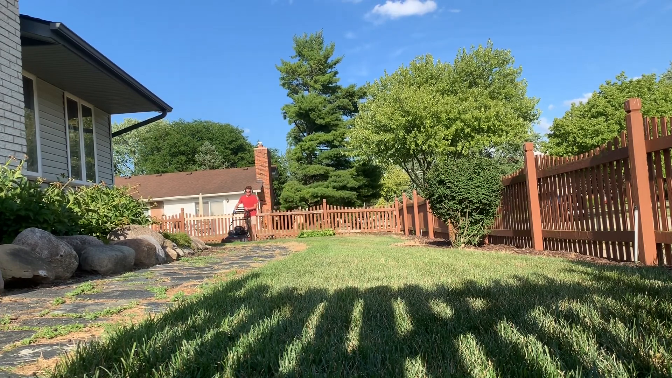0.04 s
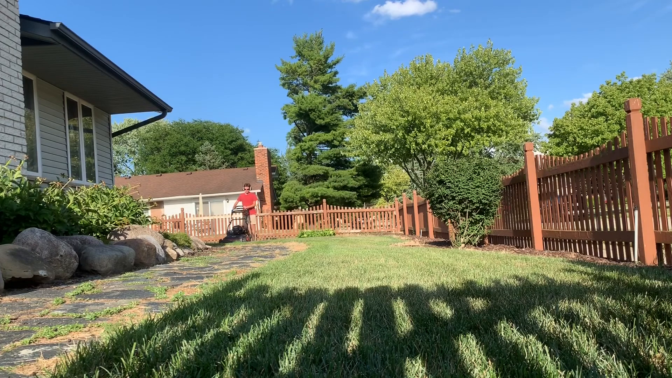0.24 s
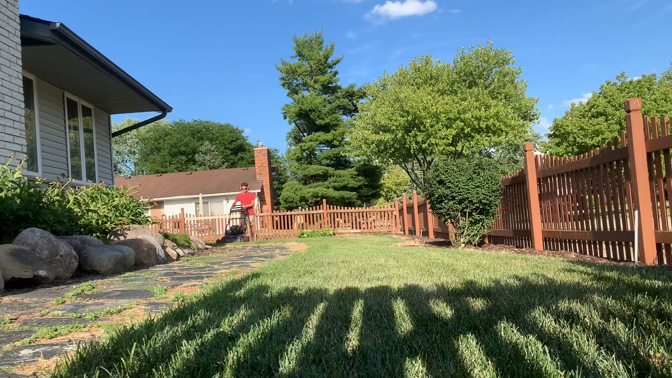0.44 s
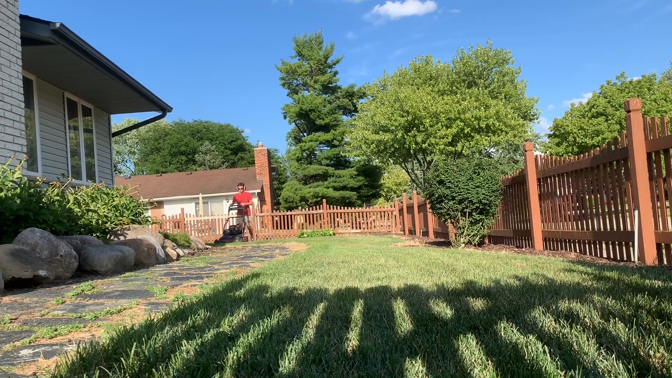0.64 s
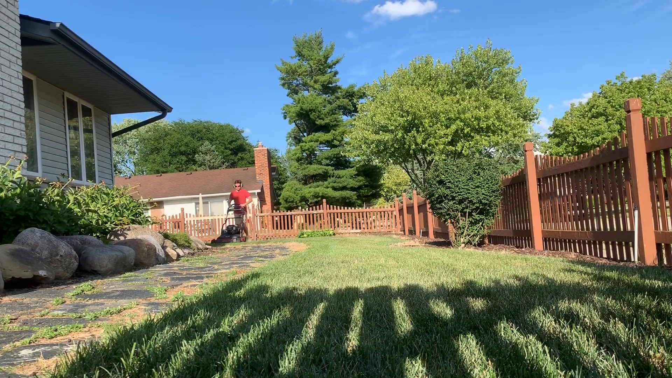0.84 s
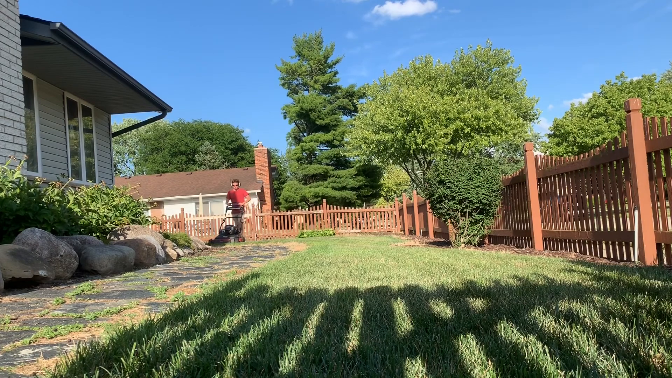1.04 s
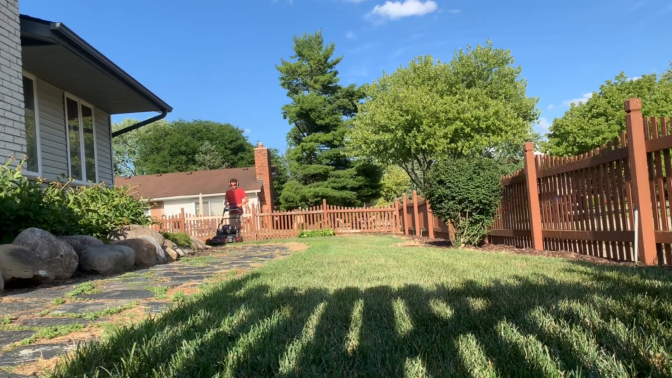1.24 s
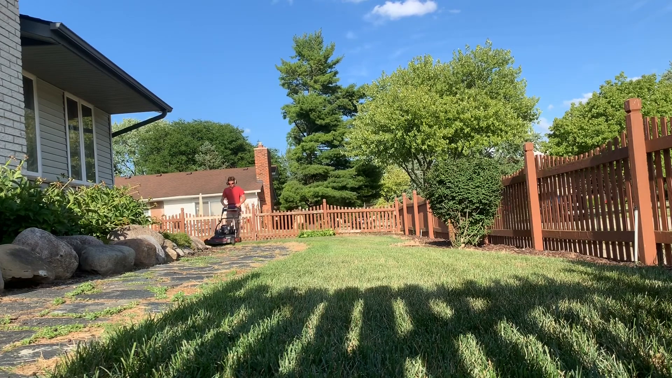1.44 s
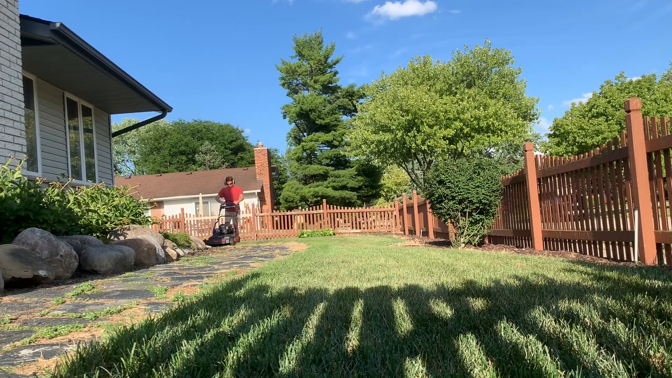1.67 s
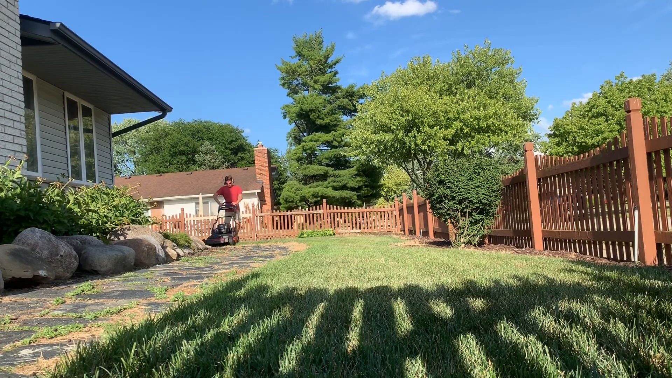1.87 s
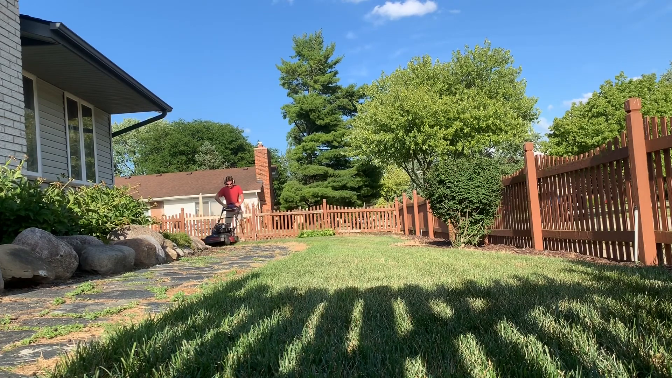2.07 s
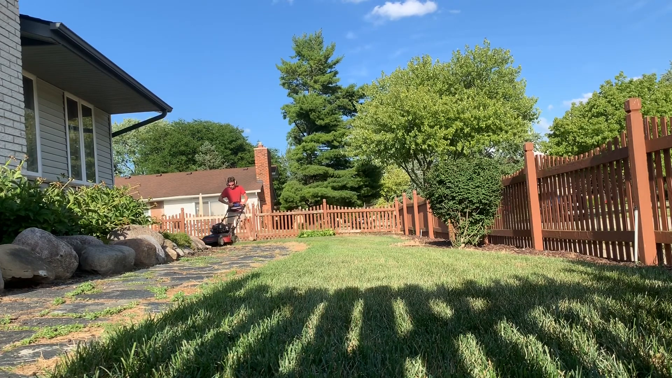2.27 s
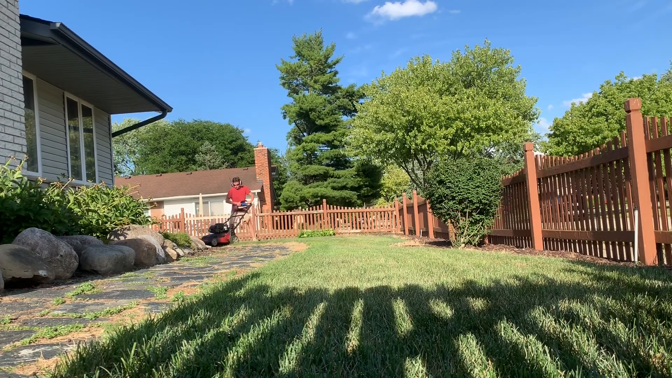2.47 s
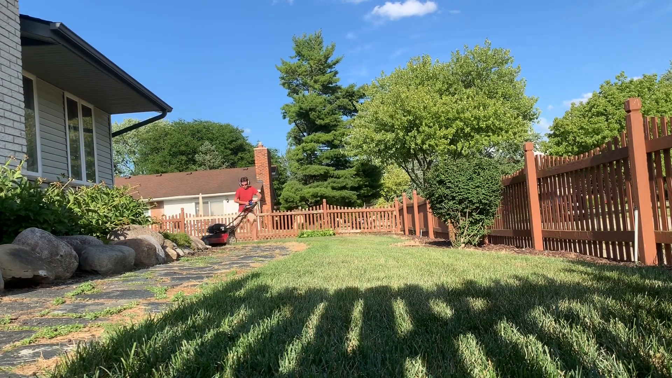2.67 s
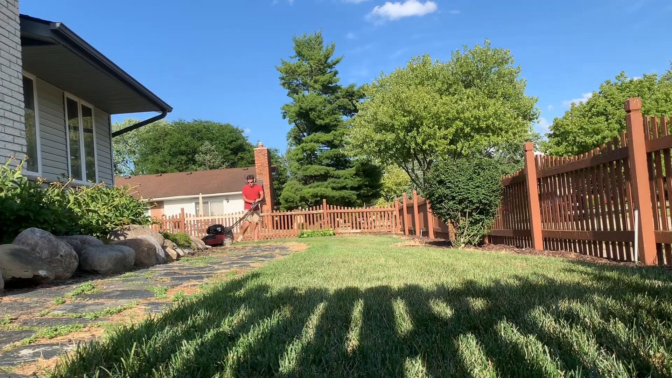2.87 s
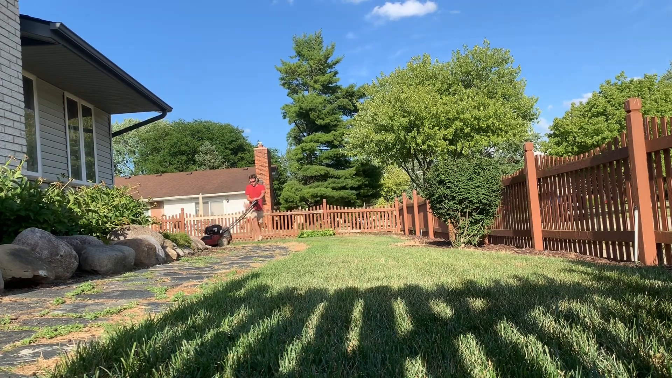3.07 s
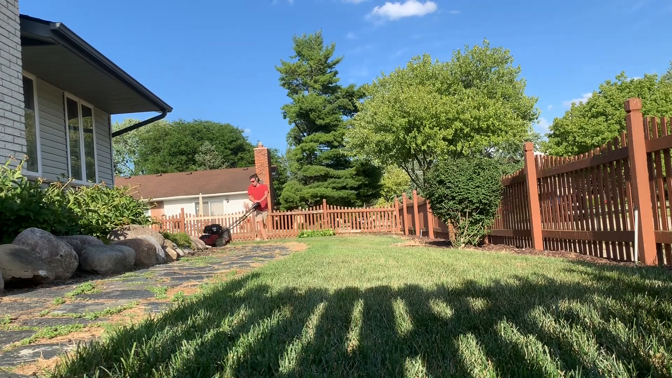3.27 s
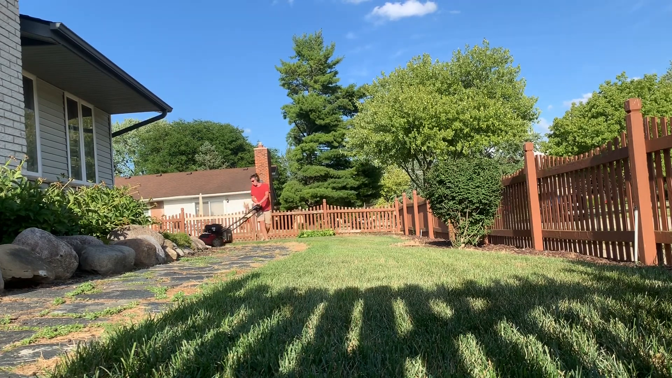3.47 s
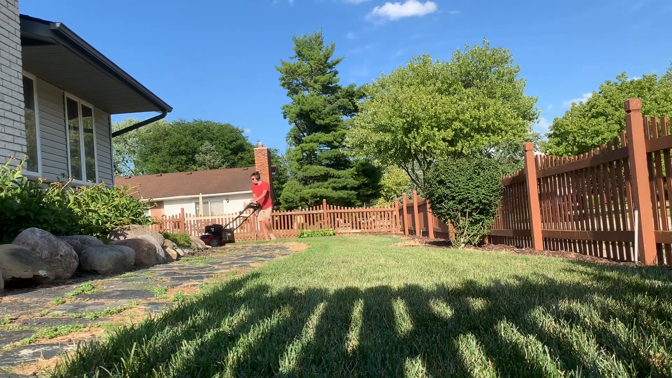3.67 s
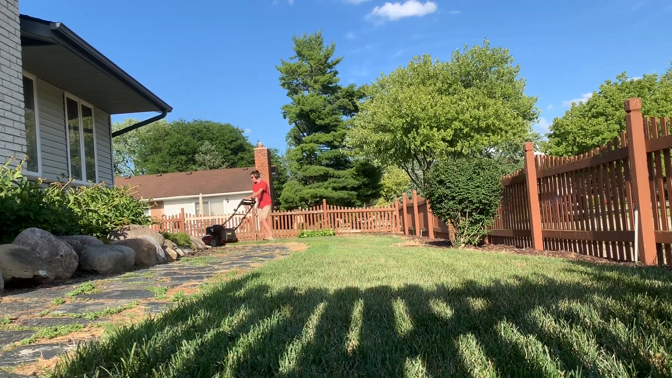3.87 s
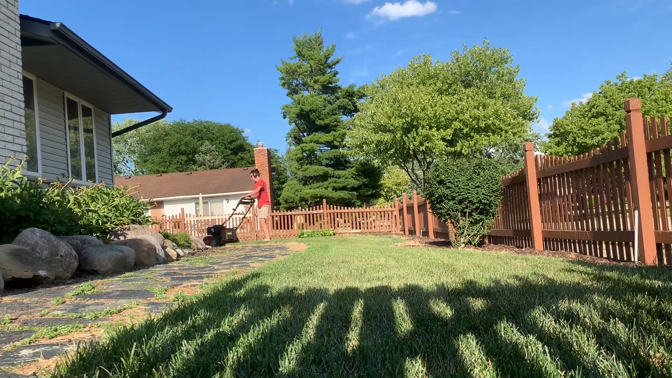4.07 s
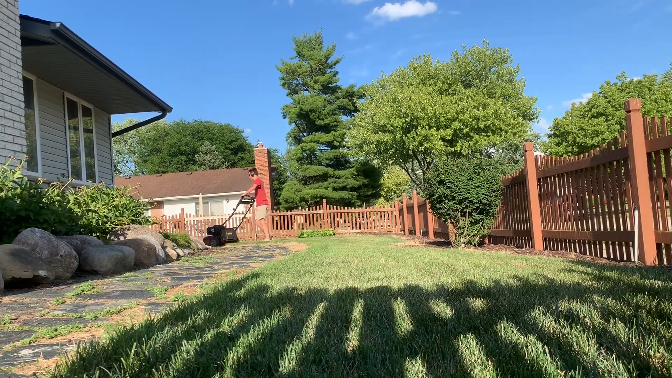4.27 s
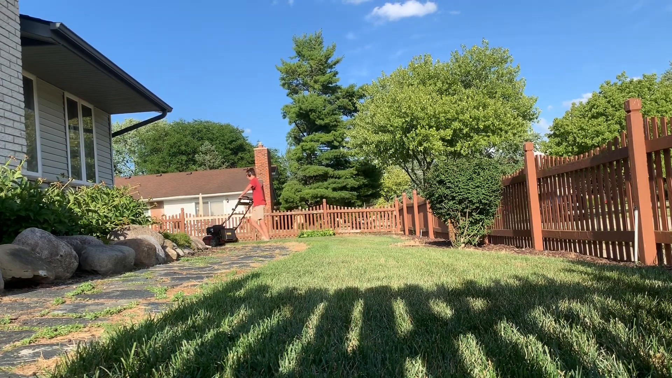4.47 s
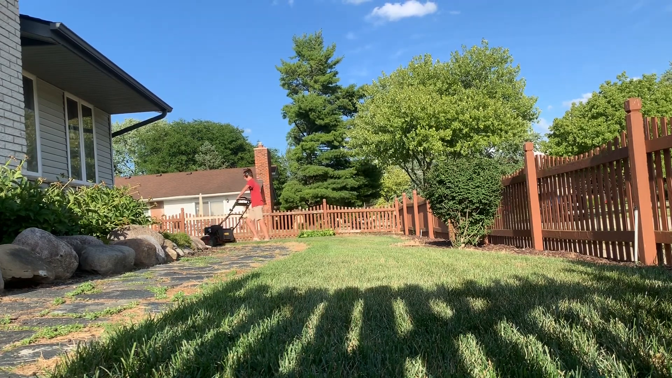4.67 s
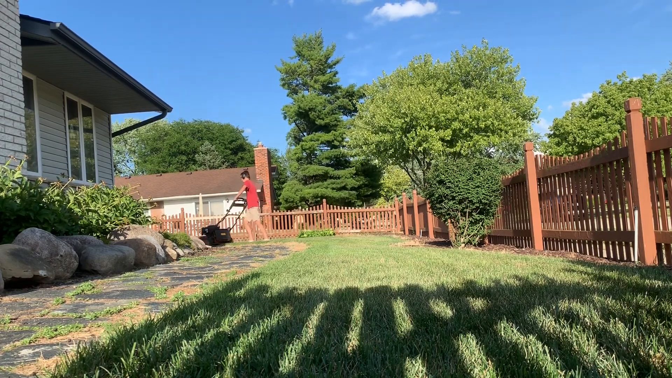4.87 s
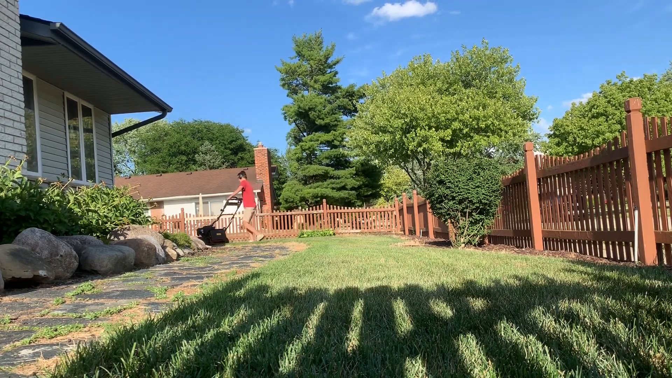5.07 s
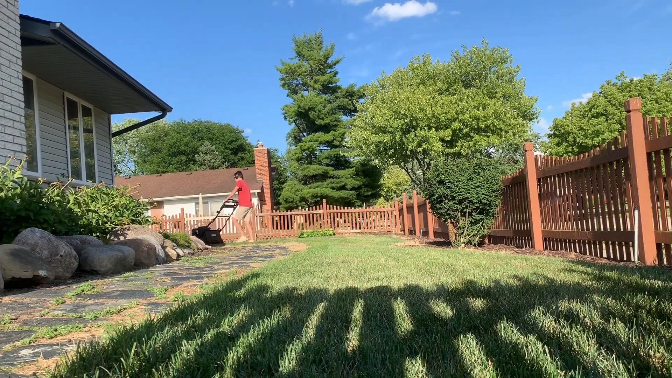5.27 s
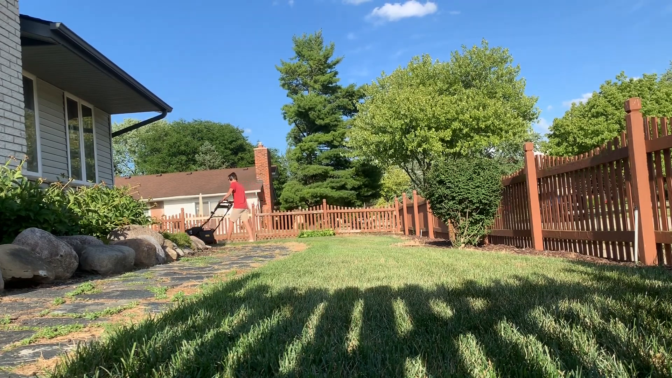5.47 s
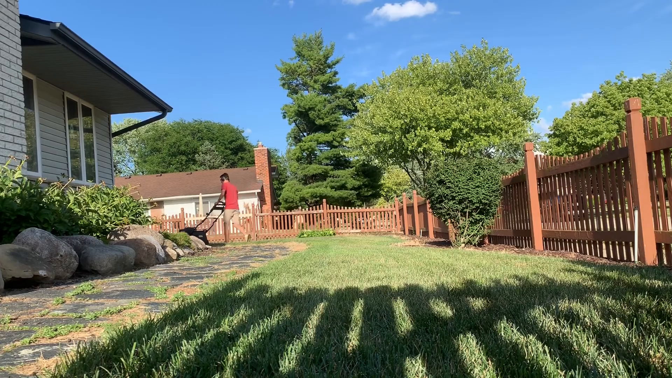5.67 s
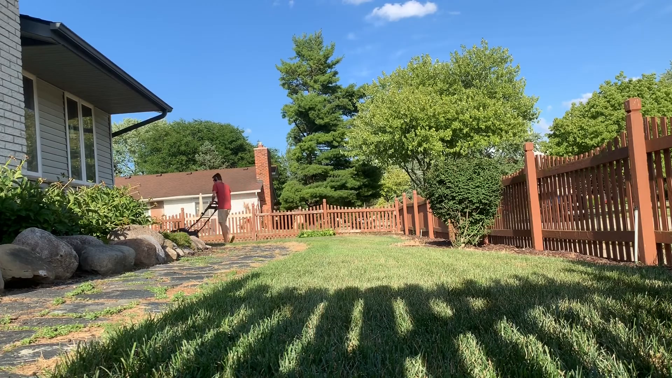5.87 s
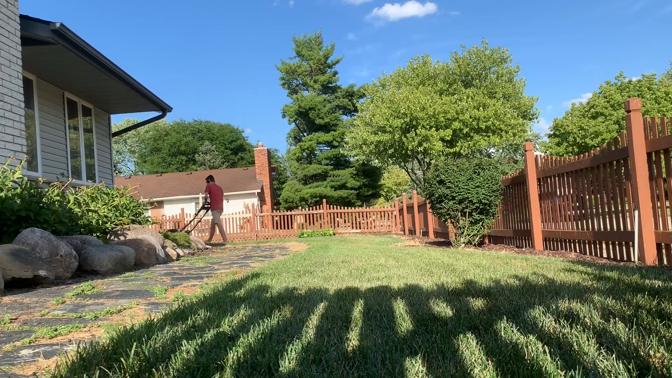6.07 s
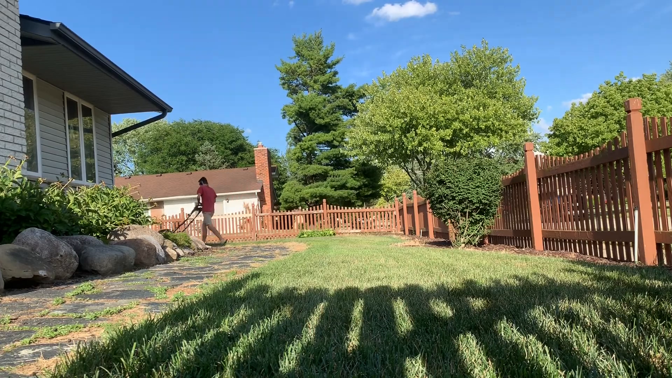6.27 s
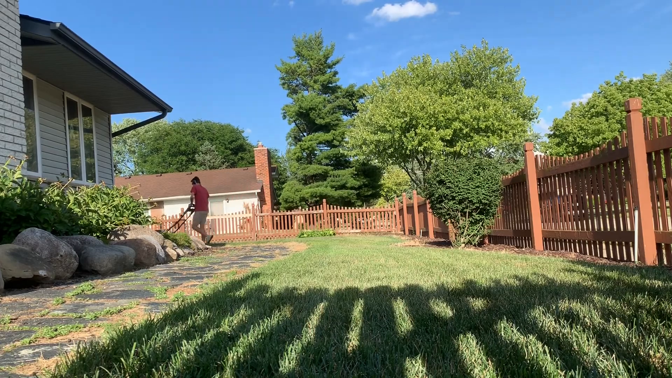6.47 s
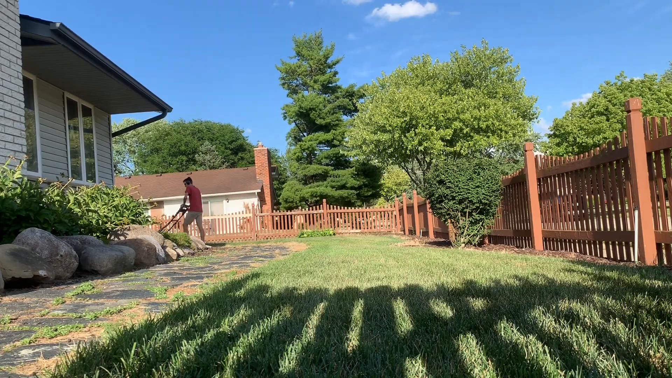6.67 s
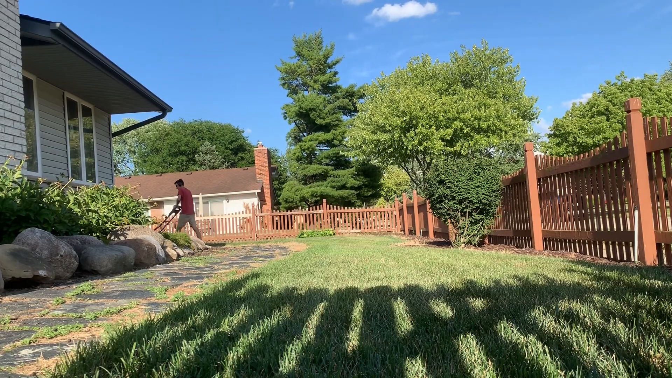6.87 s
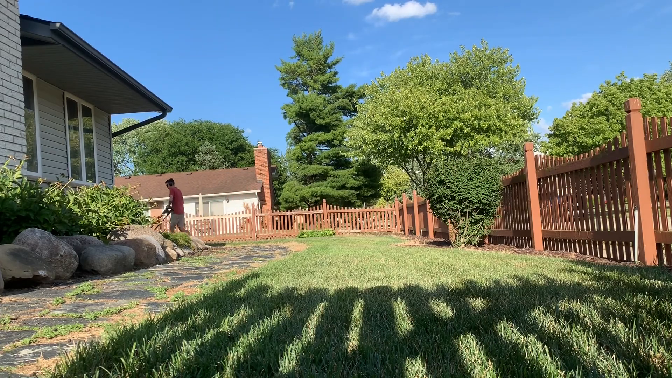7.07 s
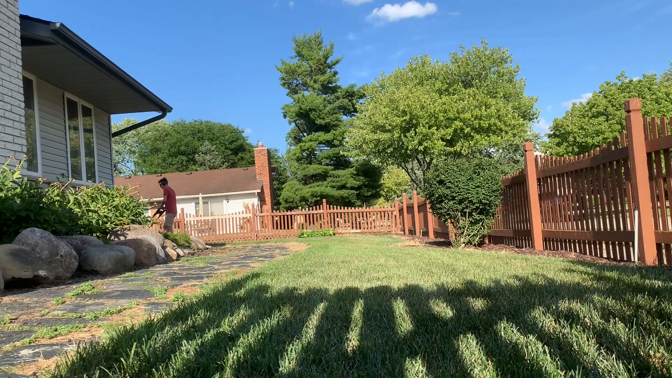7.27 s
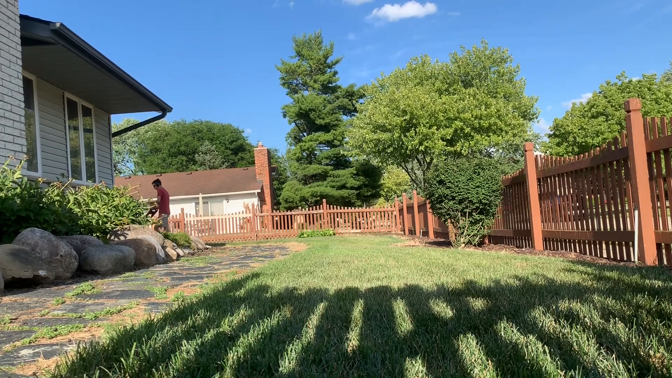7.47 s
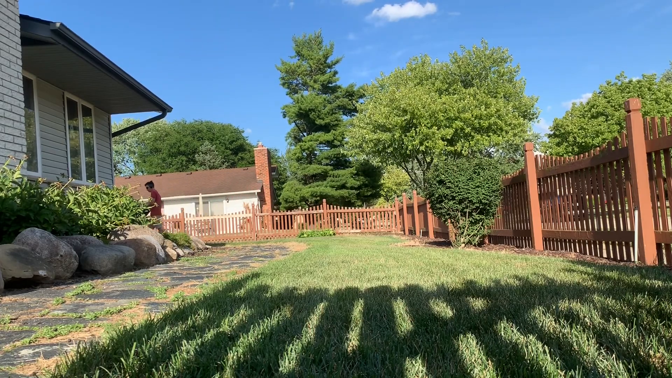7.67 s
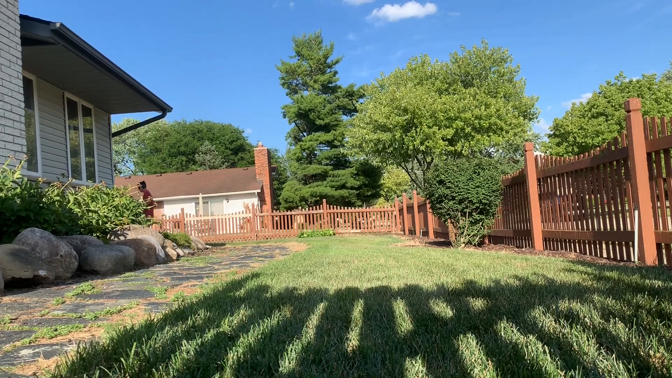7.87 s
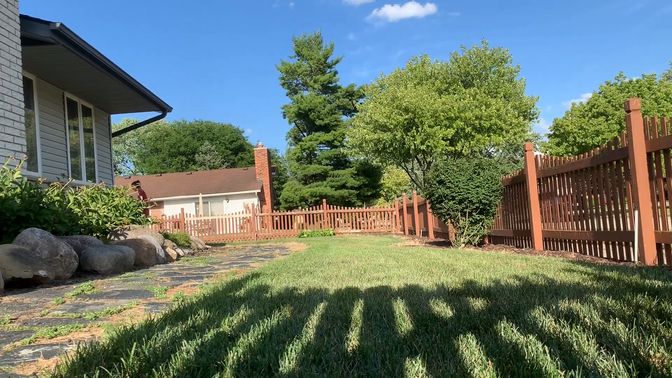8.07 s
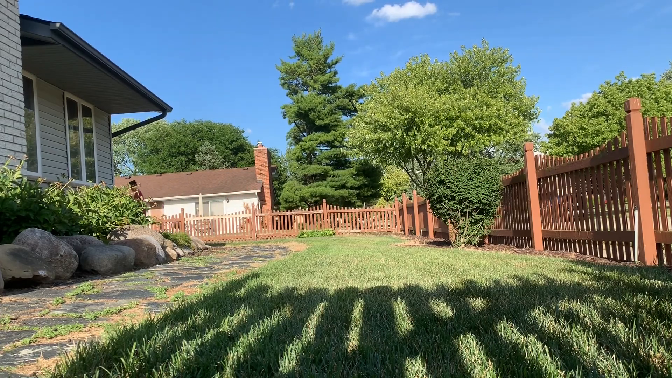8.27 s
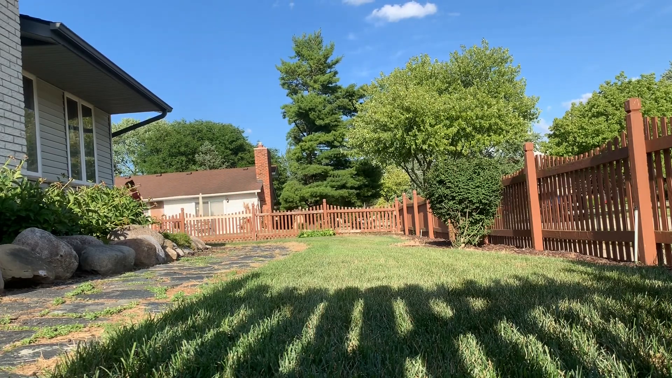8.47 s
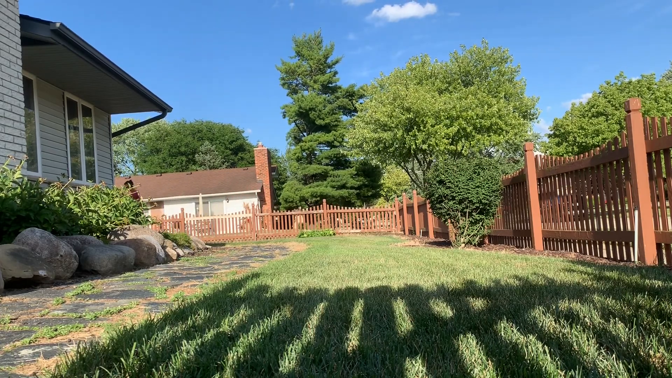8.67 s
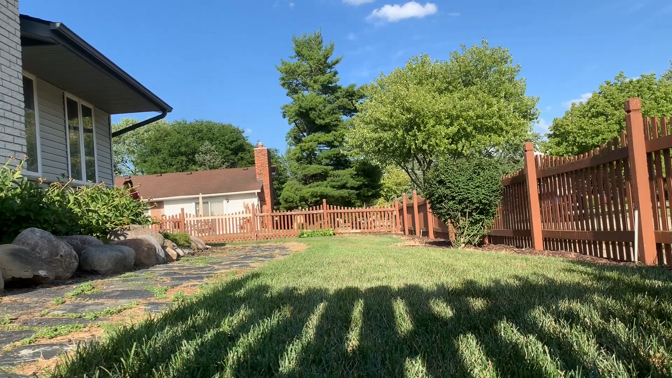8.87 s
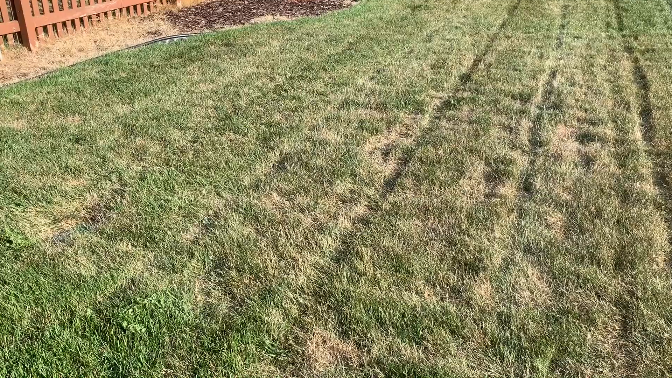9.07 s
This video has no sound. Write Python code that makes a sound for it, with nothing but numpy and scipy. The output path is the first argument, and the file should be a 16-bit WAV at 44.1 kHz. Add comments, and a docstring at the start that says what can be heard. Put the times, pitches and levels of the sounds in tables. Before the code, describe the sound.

A petrol lawn mower putters and roars on the left, rattling as it turns, fades behind a house, then cuts to soft quiet air.

```python
"""A fenced back yard beside a house: a petrol lawn mower works left of a stereo microphone pair, then goes off
behind the house. Its single cylinder fires about 27 times a second through a muffler, with a sharp bark on top;
a belt-driven part hums in step; the blade roars and drones in the deck; loose steel rattles, scrapes and squeaks.
Shaped noise makes the moving air, pulses through resonances the exhaust, and sines the hum, drone and squeaks.
At 9 s the scene changes to a quiet lawn, heard as soft noise."""
import sys
import numpy as np
from scipy import signal
from scipy.fft import rfft, irfft, next_fast_len
from scipy.io import wavfile
from scipy.ndimage import map_coordinates

SR = 44100
rng = np.random.default_rng(int(sys.argv[2]) if len(sys.argv) > 2 else 0)


def master(y):
    """Save y as 16-bit WAV."""
    cut = np.clip(np.atleast_2d(y).T, -1, 1)
    pcm = np.round(cut * 32767)  # scale
    wavfile.write(sys.argv[1], SR, pcm.astype(np.int16))


N = 402633

# The mower comes closer, turns and goes behind the house.
# Each row: time in seconds, nearness in dB against its closest point.
NEAR = [(0, -12), (1.2, -6.5), (2.2, -0.5), (3, -1), (4.1, -4), (4.9, -4), (5.6, -8.5), (6.8, -10.5),
        (7.8, -15.5), (9, -16.5)]


def amp(db):
    """Decibels to gain."""
    return 10 ** (np.asarray(db) / 20)


def unit(x):
    """x at rms 1."""
    return x / np.sqrt(np.mean(x ** 2) + 1e-20)


def along(points, hz):
    """Value at each frequency from (Hz, value) points, straight lines on a log axis."""
    f, v = np.transpose(points)
    return np.interp(np.log(hz + 1), np.log(f + 1), v)


def curves(rows):
    """One value per sample for each column after the time."""
    s, *cols = np.transpose(rows)
    return [np.interp(np.arange(N) / SR, s, c) for c in cols]


def wobble(rate):
    """A smooth random curve, rate knots a second."""
    knots = rng.standard_normal(int(N * rate / SR) + 4)
    coarse = np.arange(0, N + 64, 64)
    return np.interp(np.arange(N), coarse, map_coordinates(knots, [coarse * rate / SR]))


def swelling(rows):
    """Summed gain of bell-shaped swells given as (s, half width s, dB)."""
    t = np.arange(N) / SR
    return sum(amp(db) * np.exp(-((t - s) / width) ** 2) for s, width, db in rows)


def filtered(x, response):
    """x times a response of frequency, which may be complex."""
    m = next_fast_len(N + SR // 2, real=True)
    return irfft(rfft(x, m) * response(np.fft.rfftfreq(m, 1 / SR)), m)[..., :N]


def causal(x, spectrum, size=8192):
    """x through a body with this spectrum that rings only after it is struck (minimum phase)."""
    cepstrum = irfft(np.log(amp(along(spectrum, np.fft.rfftfreq(size, 1 / SR)))))
    # folding the cepstrum onto positive time removes any ringing ahead of the blow
    cepstrum[1:size // 2] *= 2
    cepstrum[size // 2 + 1:] = 0
    return signal.fftconvolve(x, irfft(np.exp(rfft(cepstrum))))[:N]


def rush(spectrum):
    """Stereo noise of rms 1, its left-right likeness set by the angle between mid and side."""
    # Each row: frequency in Hz, left-right likeness (1 is identical).
    likeness = [(100, .98), (400, .95), (1000, .86), (2000, .74), (3200, .55), (5000, .3), (8000, .5),
                (12000, .5)]

    def colour(hz):
        angle = np.arccos(np.clip(along(likeness, hz), -1, 1)) / 2
        return amp(along(spectrum, hz)) * [np.cos(angle), np.sin(angle)]

    mid, side = filtered(rng.standard_normal((2, N)), colour)
    return unit(np.array([mid + side, mid - side]))


def add(track, s, sound):
    """Lay a sound into a track at time s."""
    part = track[max(round(s * SR), 0):][:len(sound)]
    part += sound[:len(part)]


def bounced(x, path_ms, drift_ms, share):
    """x plus one reflection over a path whose length wanders, brought to rms 1."""
    delay = (path_ms + drift_ms * wobble(.8)) * SR / 1000
    n = np.arange(N)
    echo = np.array([np.interp(n - delay, n, side, left=0) for side in np.atleast_2d(x)])
    return unit(x + share * echo)


def yard(x):
    """House and fence scatter a short, decaying noise tail, different at each microphone."""
    # Each row: frequency in Hz, time to fall by 60 dB in seconds.
    decay = [(100, 0.082), (1000, 0.31), (10000, 0.0058)]
    hz, t, z = signal.stft(rng.standard_normal((2, SR // 2)), SR, nperseg=256)
    tail = signal.istft(z * amp(-60 * t / along(decay, hz)[:, None]), SR, nperseg=256)[1]
    return signal.fftconvolve(x[None], tail / np.linalg.norm(tail[0]), axes=1)[:, :N]


def engine_cycle():
    """Engine cycles run so far, one firing in each: the firing rate summed over time."""
    # The speed sags near 5.5 s and races at the end. Each row: time in seconds, firings per second.
    speed = [(0, 27.36), (.95, 27.23), (1.5, 27.39), (1.8, 27.67), (2.4, 27.4), (3.7, 27.32), (4.05, 27.44),
             (4.9, 27.05), (5.25, 27.14), (5.55, 26.7), (5.75, 27.07), (6.6, 27.01), (8.45, 27.4),
             (8.7, 28.3), (9, 28.86)]
    return np.cumsum(curves(speed)[0]) / SR - .08


def firings(cycle, jitter_ms, scatter_db):
    """One impulse per engine cycle, each a little different in time and strength."""
    at = np.interp(np.arange(1, int(cycle[-1])), cycle, np.arange(N))
    late, strength = rng.uniform(-1.05, 1, (len(at), 2)).T
    at = np.clip(at + late * jitter_ms * SR / 1000, 0, N - 1).astype(int)
    return np.bincount(at, amp(scatter_db * strength), N)


def turned_away():
    """0 while the muffler faces the microphones, 1 once it points away."""
    # Each row: time in seconds, share of the exhaust heard from the back.
    back_share = [(0, 0.094), (2.6, 0.43), (3.9, 1), (9, 0.94)]
    return np.clip(curves(back_share)[0], 0, 1)


def heard_db(layer):
    """Level of one of the mower's noises, from its nearness and heading."""
    # For each noise: dB when closest, dB per dB of nearness, dB lost when turned away.
    follows = {"roar": (-32, 0.88, 0.195), "hiss": (-38, 0.48, 1.76), "clatter": (-37, 1, .3)}
    closest_db, slope, turned_db = follows[layer]
    return closest_db + slope * curves(NEAR)[0] - turned_db * turned_away()


def exhaust(cycle):
    """Gas pulses ring the muffler, whose colour changes as the mower turns; the yard blurs upper harmonics."""
    # Muffler colour from in front and from behind. Each row: frequency in Hz, response in dB.
    front, back = [(27, -23), (54, -6), (82, -12), (109, -6), (137, 0), (164, -7.5), (191, -18), (218, -20),
                   (246, -18), (273, -13), (300, -9.5), (328, -13.5), (355, -16), (382, -24), (410, -14),
                   (465, -26), (520, -28), (600, -38), (2000, -50), (5000, -90)], [(27, -24), (54, -12), (82, -17), (109, -12), (137, 0),
                                          (164, -7.5), (191, -23), (218, -23), (244, -18), (272, -22),
                                          (325, -24), (355, -16), (380, -15.5), (460, -27), (515, -23),
                                          (570, -31), (680, -30), (800, -44), (2000, -52), (5000, -90)]
    # Each row: time in seconds, exhaust level in dB.
    level = [(0, -26.5), (2.6, -23), (4.5, -27), (5.5, -30), (6.2, -25.5), (7.3, -32.5), (8.1, -41),
             (9, -34)]
    pulses = firings(cycle, jitter_ms=.15, scatter_db=1.2)
    turned = turned_away()
    tone = (1 - turned) * causal(pulses, front) + turned * causal(pulses, back)
    # the muffler's chambers hold back the bass in time, which rounds off each pulse
    tone = filtered(tone, lambda hz: np.exp(-5j * np.arctan(hz / 260)))
    blur = filtered(yard(tone)[0], lambda hz: along([(170, 0), (420, .2), (700, .65)], hz))
    return amp(curves(level)[0]) * bounced(tone + blur, path_ms=36.5, drift_ms=.4, share=.3)


def bark(cycle):
    """Each firing cracks in a short burst of turbulent gas, never twice the same colour, with a close bounce."""
    # Strongest while the muffler faces the microphones. Each row: time in seconds, level in dB.
    level = [(0, -39.5), (.7, -37.5), (2.3, -37), (4.5, -54), (6, -50), (9, -53.5)]
    # A few firings crack louder. Each row: time in seconds, extra dB.
    hard_firings = [(.113, 3), (.627, 4.5), (.958, 3.5), (1.216, 4), (1.323, 2), (1.58, 4)]
    # Centres in Hz of the overlapping bands that each firing lights differently.
    bands_hz = [300, 1500, 2300, 3600, 8000]
    decay_s, attack_s, scatter_db = 0.0047, .0006, 2.1
    t = np.arange(SR // 20) / SR
    puff = np.exp(-t / decay_s) * (1 - np.exp(-t / attack_s))
    accent = np.ones(N)
    for s, extra_db in hard_firings:
        accent[np.abs(np.arange(N) / SR - s) < .015] = amp(extra_db)
    edge = rush([(300, 2.5), (700, -14), (1100, 0), (1700, 7), (1950, 3), (2300, 5.0), (3200, -4.5),
                 (6000, -9.5), (11000, -10.5), (15800, -9.0)])
    cracks = 0
    for band in np.eye(len(bands_hz)):
        # .025 of a cycle ahead of the exhaust pulse
        impulses = firings(cycle + .025, jitter_ms=.6, scatter_db=scatter_db)
        gate = signal.fftconvolve(impulses, puff)[:N]
        cracks = cracks + gate * filtered(edge, lambda hz: np.interp(hz, bands_hz, band))
    return amp(curves(level)[0]) * bounced(accent * cracks, path_ms=2.8, drift_ms=.5, share=.5)


def belt_hum(cycle):
    """A hum with a rough whine on top, geared to the engine; it flutters as the belt slips."""
    # Each row: time in seconds, fundamental in dB, overtone reference in dB.
    hum = [(0, -24, -34), (.4, -28, -31), (1, -25, -34.5), (1.5, -25, -33), (2.35, -25, -27),
           (2.9, -21, -30), (3.2, -24.5, -53), (3.85, -30.5, -43), (4.2, -30.5, -33.5), (4.6, -28, -45.5),
           (5.2, -33.5, -44), (6.3, -34.5, -51), (7.4, -35.5, -47.5), (9, -44.5, -50)]
    # Harmonics 2 and 3 against that reference. Each row: dB facing the microphones, dB turned away.
    low_overtones = [(0, 1), (-17.5, -6)]
    # Single overtones swell as the mower swings round. By harmonic number,
    # each row: centre in seconds, half width in seconds, level in dB.
    swells = {3: [(.5, 0.54, -46), (1.65, 0.27, -36.5), (2.35, 0.13, -30), (3.3, .4, -41.5),
              (4.15, 0.11, -36), (4.75, 0.31, -39), (6.6, 0.53, -40), (7.5, 0.3, -43.5),
              (8.5, 0.22, -47.5)], 4: [(1, 0.78, -50), (3.1, 0.33, -44.5), (5.75, 0.24, -43),
              (6.45, 0.49, -47.5)], 5: [(5.2, 0.81, -50.5)], 6: [(2.17, .17, -40.5), (2.87, .26, -38)],
              9: [(3.32, .2, -35.5)]}
    belt_ratio = 5.35  # hum cycles per firing
    overtone_fade_db, whine_fade_db = 2.5, 3.5  # slow random fading
    whine_closest_db, whine_slope = -51.5, 1.16  # level when closest; dB per dB of nearness
    blur_rad = .65  # the deck's turbulence blurs the phase of each upper harmonic

    phase = 2 * np.pi * belt_ratio * cycle + .15 * wobble(3) + .06 * wobble(30)
    fundamental_db, overtones_db = curves(hum)
    turned = turned_away()
    levels_db = [fundamental_db]
    for front_db, back_db in low_overtones:
        heading_db = (1 - turned) * front_db + turned * back_db
        levels_db.append(overtones_db + heading_db + overtone_fade_db * wobble(2.62))
    whine_db = whine_closest_db + whine_slope * curves(NEAR)[0]
    for _ in range(4, 13):
        levels_db.append(whine_db + whine_fade_db * wobble(3))

    total = 0
    for k, db in enumerate(levels_db, 1):
        gain = np.hypot(amp(db), swelling(swells.get(k, [])))
        flutter = amp(min(.6 * k, 1.8) * wobble(14))
        blur = blur_rad * wobble(60) if k > 5 else 0
        total = total + gain * flutter * np.sin(k * phase + blur + rng.uniform(0, 2 * np.pi))
    return np.sqrt(2) * total


def blade(cycle):
    """Air churned under the deck: body, roar and hiss noise, pulsing with each turn of the shaft."""
    # Noise colours. Each row: frequency in Hz, relative density in dB per Hz.
    deck_colour, roar_colour, hiss_colour = [(90, -17), (170, -1), (240, -6), (330, 3), (450, 2),
                                             (560, -4.5), (680, -10.5), (1000, -63)], [(450, -59), (680, -7.5), (850, 0), (1020, 2.5),
                                                           (1250, 0.5), (1450, 1), (1750, -1.5), (1950, -9),
                                                           (2250, -26), (2550, -24), (4000, -39.5)], [(1700, -39), (2100, 7.5),
                                                                         (2330, 8.5), (2550, -0.5),
                                                                         (3700, 0.5), (5200, -3.5),
                                                                         (6200, -8), (8000, -0.5),
                                                                         (10500, -27.5), (13000, -12),
                                                                         (15800, -41)]
    # Air churning in the deck. Each row: time in seconds, level in dB.
    deck_level = [(0, -40.5), (1.1, -38), (1.9, -33), (2.9, -37), (3.5, -34.5), (4.2, -37.5), (5.3, -35),
                  (6.8, -39.5), (7.9, -43), (9, -45)]
    grain_db = 1.3  # coarse turbulence in the roar
    churn = bounced(rush(roar_colour), path_ms=5, drift_ms=.45, share=.5)
    churn = bounced(churn, path_ms=12, drift_ms=.5, share=.4)
    spray = bounced(rush(hiss_colour), path_ms=6, drift_ms=.15, share=.5)
    turn = 2 * np.pi * 2 * cycle  # two shaft turns per firing
    swish = unit(1 + 0.078 * np.cos(turn) + 0.052 * np.cos(2 * turn))
    deck = amp(curves(deck_level)[0] + 1.2 * wobble(7)) * rush(deck_colour)
    roar = amp(heard_db("roar") + grain_db * (wobble(40) + wobble(150))) * churn
    hiss = amp(heard_db("hiss")) * spray
    return swish * (deck + roar + hiss)


def blade_tone(cycle):
    """Two tips sweep the air on each of the shaft's two turns a cycle: a low drone and its octave."""
    # Each row: time in seconds, tone at the tip rate in dB, its octave in dB.
    level = [(0, -40, -61), (3.3, -45, -56), (3.7, -40, -47.5), (5, -34, -42.5), (6.2, -43.5, -38.5),
             (7.5, -38.5, -41), (9, -41.5, -42.5)]
    phase = 2 * np.pi * 4 * cycle + .15 * wobble(8)
    tones = [amp(db + 2.17 * wobble(11)) * np.sin(k * phase) for k, db in enumerate(curves(level), 1)]
    return np.sqrt(2) * sum(tones)


def boom():
    """The deck's low boom bends round the house, so its noise stays while the roar fades."""
    colour = [(100, -29), (170, -0.5), (225, -1.0), (270, -1.5), (340, -19), (700, -66)]
    return amp(-38.5 + 0.58 * wobble(7.4)) * rush(colour)


def clatter(cycle):
    """Valve gear and piston repeat much the same fine noise every cycle; four patterns slowly trade places."""
    place = cycle % 1 * 1600  # position within the 1600 steps of a pattern
    patterns = rng.standard_normal((4, 1601))
    angle = np.pi * (np.arange(N) / SR * 1.1 + 0.31 * wobble(1.52))
    repeats = 0
    for k, pattern in enumerate(patterns):
        weight = np.cos(angle * (1 + k / 2) + k)
        repeats = repeats + weight * np.interp(place, np.arange(len(pattern)), pattern)
    colour = [(400, -11.5), (700, -7.5), (1050, 1), (1500, -1.0), (1950, -9.0), (2250, -7.5),
              (3000, -8.0), (6000, -74), (12000, -43)]
    return amp(heard_db("clatter")) * unit(filtered(repeats, lambda hz: amp(along(colour, hz))))


def shaking():
    """Strength of the steel's shaking: jolts start hard, hold and die away over a chatter; knocks ruffle both."""
    # Running chatter between the jolts. Each row: time in seconds, level in dB.
    chatter = [(0, -52), (.4, -45.5), (3, -45.5), (3.8, -48), (9, -50.5)]
    # Bumps that shake the loose steel. Each row: start in seconds, hold in seconds, nominal strength in dB.
    jolts = [(0.217, 0.01, -36.5), (0.396, .13, -35.5), (0.656, 0.19, -38.5), (0.952, 0.065, -31.5),
             (1.098, 0.084, -33.5), (1.424, 0.04, -30.5), (1.642, 0.019, -28), (1.75, 0.029, -35.5),
             (2.071, 0.018, -33.5), (2.366, 0.05, -34), (2.517, 0.019, -34), (2.625, 0.25, -35),
             (2.991, 0.072, -36.5), (3.28, 0.06, -37.5), (3.407, 0.042, -31), (3.532, 0.022, -37),
             (4.066, 0.05, -36), (4.158, 0.059, -35), (4.23, 0.032, -35), (4.488, 0.012, -36.5),
             (4.673, 0.05, -34), (4.863, 0.07, -41.5), (5.26, 0.091, -39.5), (5.45, 0.012, -38),
             (5.82, 0.046, -38.5), (5.936, 0.08, -37.5), (6.32, 0.13, -45), (7.083, 0.18, -41.5),
             (7.488, 0.035, -48), (7.578, 0.23, -48.5), (8.293, 0.06, -46), (8.546, 0.05, -46.5)]
    sag_db, t60_s = 2.5, 0.12  # how far a jolt settles below its nominal strength; its dying away
    accent_db, accent_s = 6, 0.0098  # the first blow stands out
    knocks_per_s, knock_s, knock_size = 32, 0.029, 0.74  # chance knocks within the shaking
    energy = amp(curves(chatter)[0] + 2.7 * wobble(22)) ** 2
    t = np.arange(SR) / SR
    for s, length, db in jolts:
        release_db = 60 * np.maximum(t - length, 0) / t60_s
        blow_db = accent_db * np.exp(-t / accent_s)
        add(energy, s, amp(db - sag_db + blow_db - release_db) ** 2)
    hits = (rng.random(N) < knocks_per_s / SR) * amp(5.3 * rng.standard_normal(N))
    knocks = signal.lfilter([1], [1, -np.exp(-1 / (knock_s * SR))], hits)
    return np.sqrt(energy) * unit(1 + knock_size * knocks)


def rattle():
    """Jolts set loose steel buzzing: a dense run of tiny contacts that dies away and rings the metal."""
    # Colour of the contacts. Each row: frequency in Hz, relative density in dB per Hz.
    rasp_colour = [(1500, 5.5), (3500, 2), (5000, 2), (6100, 5.5), (8000, 3.5), (11300, 10), (13000, 2.5),
                   (15800, -2.5)]
    # Ringing of the loose steel. Each row: frequency in Hz, width in Hz, relative level in dB.
    steel = [(4080, 160, 6), (5560, 55, 8.5), (6490, 35, 4), (6720, 35, 7.5), (9280, 70, 4), (9570, 60, 4),
             (9900, 50, 2), (10600, 60, 5), (10900, 60, 8), (11300, 70, 8), (12300, 120, 4), (14020, 60, 2),
             (14700, 80, 1)]
    mode_growth = [(5500, 1.5), (11000, 0.78)]  # (Hz, dB per dB of shaking): gentle shaking dulls low modes most
    hard = amp(-26)  # shaking at which the modes stand at their table balance
    shake = shaking()
    contacts = unit(rng.standard_normal(N) * amp(2.8 * wobble(500)))
    rasp = unit(filtered(contacts, lambda hz: amp(along(rasp_colour, hz))))
    ring = 0
    for hz, width, db in steel:
        drive = contacts * hard * (shake / hard) ** along(mode_growth, hz)
        mode = signal.lfilter(*signal.iirpeak(hz, hz / width, SR), drive)
        # the point of contact wanders, so each mode comes and goes by itself
        ring = ring + amp(db + 3.6 * wobble(9.1)) * mode
    return rasp * shake + amp(-2.5) * ring


def scrapes():
    """A wheel rubs the steel in short strokes; its low modes chirr as sines with an unsteady pitch."""
    # Each row: start in seconds, length in seconds, lower modes in dB, upper modes in dB.
    rubs = [(2.702, 0.29, -50, -55), (2.984, 0.11, -55, -50), (4.66, .08, -55, -53),
            (5.27, 0.058, -54, -49), (5.44, 0.047, -54, -48), (5.808, .09, -54, -51), (5.917, .1, -51, -48),
            (6.335, 0.16, -52, -52), (6.515, 0.042, -50, -48), (6.85, .07, -49, -48),
            (6.963, 0.097, -55, -64), (7.132, 0.15, -59, -52), (7.378, .05, -54, -63),
            (7.482, 0.081, -52, -52), (7.58, .07, -54, -56), (7.67, 0.12, -52, -50),
            (7.81, 0.061, -56, -66), (7.893, 0.1, -49, -51), (8.07, .055, -51, -66),
            (8.168, 0.036, -50, -64), (8.29, .06, -54, -53), (8.4, .035, -56, -66), (8.46, .05, -56, -63),
            (8.557, 0.054, -58, -55), (8.67, 0.12, -57, -52), (8.77, 0.092, -65, -52),
            (8.905, 0.16, -66, -53)]
    # Lower and upper pair of modes. Each row: frequency in Hz, width in Hz, relative level in dB.
    mode_pairs = [
        [(4100, 300, -2.5), (5560, 220, 2)],
        [(6490, 70, -2.5), (6720, 70, -2.5)],
    ]
    # The rubbing point slides onto a node of the third mode. Each row: time in seconds, gain in dB.
    slide = [(7.7, -0.5), (8.3, -9)]
    strokes = np.zeros((2, N))
    for s, length, *levels in rubs:
        u = np.linspace(0, 1, int(length * SR))
        envelope = np.abs(np.sin(np.pi * u ** .8)) ** .5  # rises faster than it eases off
        for stroke, db in zip(strokes, levels):
            add(stroke, s, amp(db) * envelope)
    modes = []
    for stroke, pair in zip(strokes, mode_pairs):
        for hz, width, db in pair:
            phase = 2 * np.pi * np.cumsum(hz + width / 2 * wobble(300)) / SR
            ring = unit(amp(4 * wobble(140)) * np.sin(phase))
            modes.append(stroke * amp(db) * ring)
    modes[2] = modes[2] * amp(curves(slide)[0])
    return sum(modes)


def squeaks():
    """A wheel squeaks thinly: short sine chirps with a rough pitch, each rising a little."""
    # Each row: start in seconds, length in seconds, middle pitch in Hz, peak level in dB.
    chirps = [(4.35, .024, 13900, -37), (4.367, 0.042, 12200, -33), (4.411, .018, 11470, -29.5),
              (4.424, 0.026, 11750, -31), (4.445, 0.04, 11500, -39)]
    track = np.zeros(N)
    for s, length, hz, db in chirps:
        u = np.linspace(0, 1, int(length * SR))
        pitch = hz * (1 + 0.026 * (u - .5) + 0.027 * rng.standard_normal(len(u)))
        add(track, s, amp(db) * np.sin(np.pi * u) * np.sin(2 * np.pi * np.cumsum(pitch) / SR))
    return track


def moving_left(x):
    """The lag between the microphones grows as the mower crosses the yard."""
    # Extra lead of the left microphone. Each row: time in seconds, lead in ms.
    drift = [(0, -0.018), (9, 0.072)]
    n, half = np.arange(N), curves(drift)[0] * SR / 2000
    return np.array([np.interp(n + half, n, x[0]), np.interp(n - half, n, x[1])])


def over_grass(x):
    """As the mower goes off, the reflection from the lawn hollows out a band around 860 Hz."""
    share_lost = curves([(5, 0), (7.5, .45)])[0]  # (s, share)
    return x - share_lost * signal.lfilter(*signal.iirpeak(860, 6, SR), x)


def from_left(x):
    """Sound from the left reaches the left microphone first, by a lead that depends on frequency."""
    # Each row: frequency in Hz, lead of the left microphone in ms.
    lead = [(30, 1.35), (60, .68), (125, .32), (250, .21), (600, .14), (1000, .16), (1600, .11),
            (2000, .11), (3000, .08), (4000, .07), (5500, .24), (6400, .263)]
    sides = np.array([[1], [-1]])  # half the lead forward on the left, half back on the right
    return filtered(x, lambda hz: np.exp(1j * np.pi * hz * along(lead, hz) / 1000 * sides))


def thumps():
    """Now and then the air buffets dully: a heavy low sine that dies in a few milliseconds."""
    # Each row: start in seconds, frequency in Hz, level before the decay in dB.
    buffets = [(1.833, 160, -10), (3.557, 110, -10), (5.350, 70, -7), (5.372, 111, -6.5),
               (5.427, 110, -12.5), (5.441, 60, -12), (6.092, 75, -11), (6.173, 75, -14), (7.479, 60, -14)]
    track, t = np.zeros(N), np.arange(SR // 10) / SR
    for s, hz, db in buffets:
        add(track, s, amp(db) * np.sin(2 * np.pi * hz * t) * np.exp(-t / 0.0064))
    return track


def rumble():
    """Moving air rumbles as low noise and swells in a few gusts."""
    # Each row: time in seconds, steady level in dB.
    level = [(0, -36), (1.2, -33.5), (2.7, -35), (3.7, -40), (4.6, -31.5), (6.8, -38), (9, -36.5)]
    # Each row: centre in seconds, half width in seconds, level in dB.
    gusts = [(1.88, 0.092, -29), (5.5, 0.18, -26.5), (6.1, 0.11, -35), (7.47, 0.082, -32)]
    # Each row: frequency in Hz, relative density in dB per Hz.
    low_colour = [(12, -29), (25, -9), (38, 2.5), (60, 1), (90, -2.5), (140, -10), (250, -20.5),
                  (500, -41.5)]
    return np.hypot(amp(curves(level)[0]), swelling(gusts)) * amp(1.2 * wobble(9)) * rush(low_colour)


def quiet_lawn():
    """The open lawn's air: soft, mostly low noise with an uneven level."""
    # Each row: frequency in Hz, relative density in dB per Hz.
    lawn_colour = [(15, -21), (50, 4.5), (130, -7.5), (300, -17), (1000, -28), (4500, -47), (5500, -54),
                   (15000, -68)]
    return amp(-42.0 + 2 * wobble(20)) * rush(lawn_colour)


def scene():
    """The mower in the yard, then the quiet lawn."""
    cycle = engine_cycle()
    metal = rattle() + scrapes() + squeaks() + clatter(cycle)
    engine = exhaust(cycle) + bark(cycle) + belt_hum(cycle)
    deck = blade(cycle) + blade_tone(cycle) + boom()
    mower = moving_left(engine + deck) + metal
    outdoors = from_left(over_grass(mower) + rumble() + thumps()) + amp(-9) * yard(metal)
    change_s = 9.0  # the yard fades out just before this, the lawn fades in just after
    t = np.arange(N) / SR
    yard_fade = np.clip((change_s - t) / 0.031, 0, 1)
    lawn_fade = np.clip((t - change_s) / 0.033, 0, 1)
    return outdoors * yard_fade + quiet_lawn() * lawn_fade


def record(dry):
    """The microphone chain cuts the deepest bass and keeps nothing above its band limit."""
    no_deep_bass = signal.lfilter(*signal.butter(2, 20, "high", fs=SR), dry)
    top_hz = 15850
    return filtered(no_deep_bass, lambda hz: hz < top_hz)


dry = scene()
out = record(dry)
master(out)
```